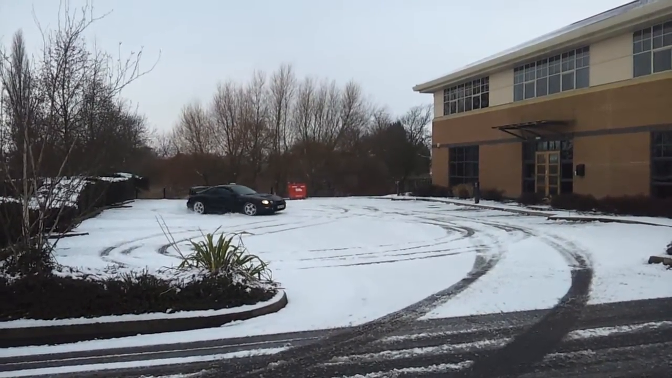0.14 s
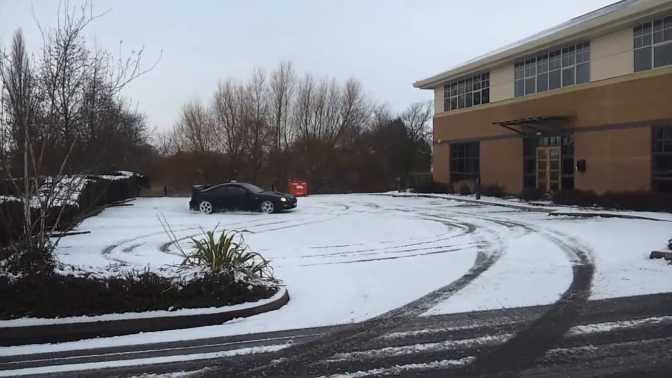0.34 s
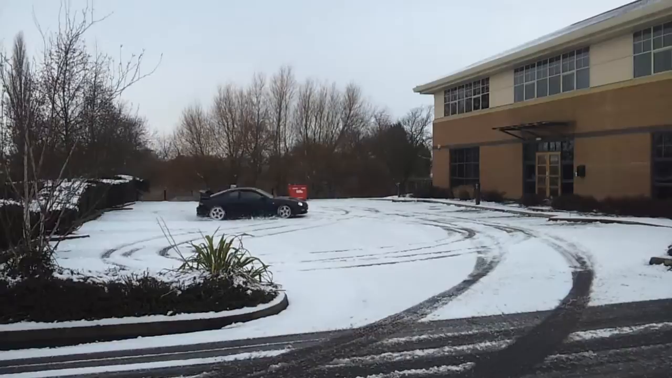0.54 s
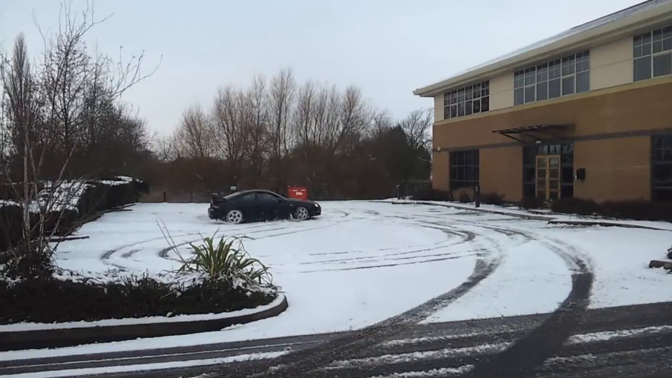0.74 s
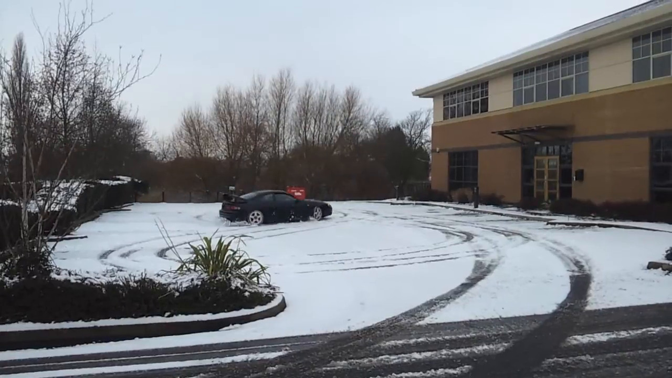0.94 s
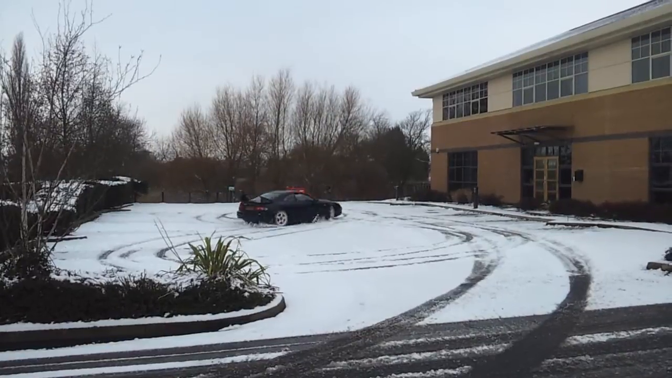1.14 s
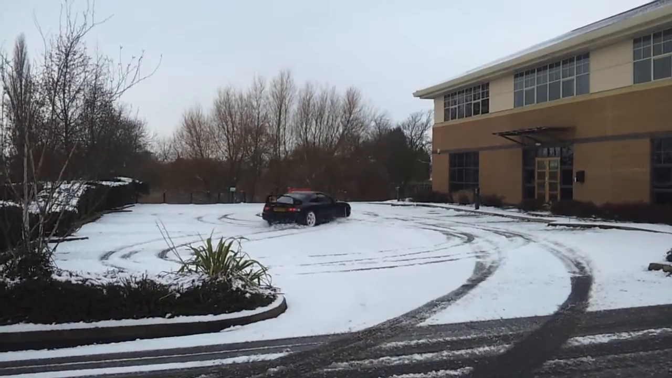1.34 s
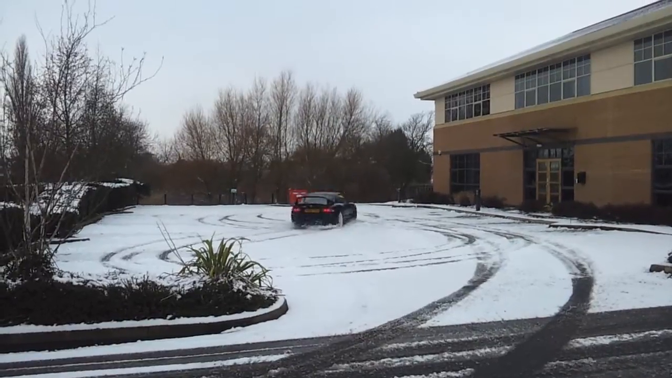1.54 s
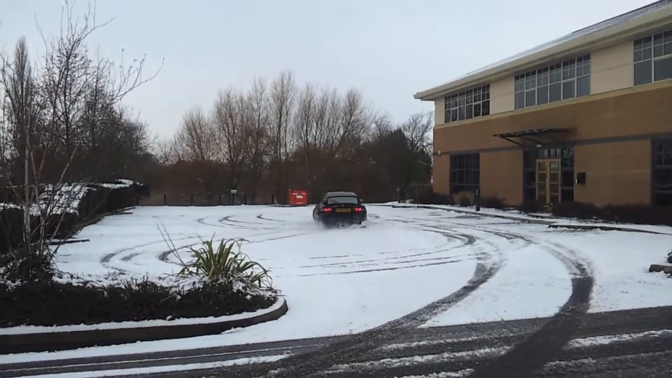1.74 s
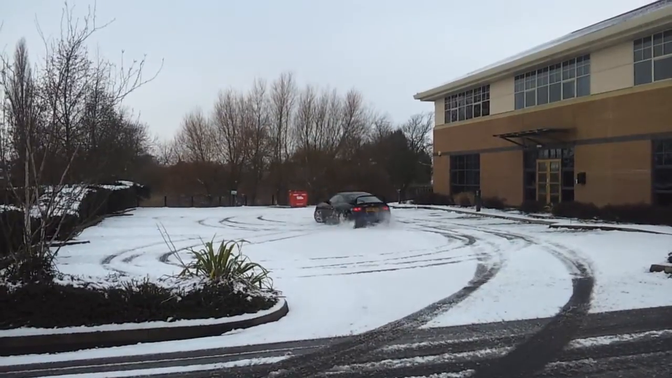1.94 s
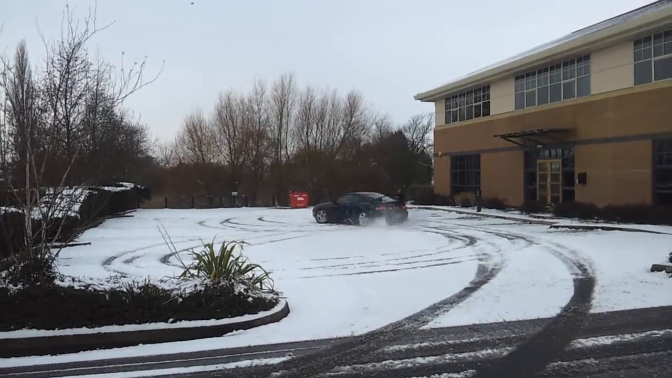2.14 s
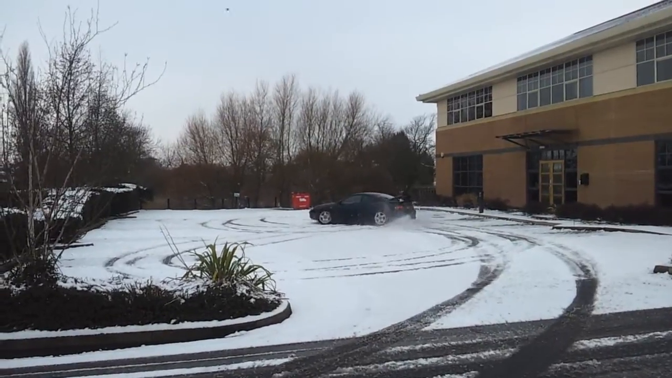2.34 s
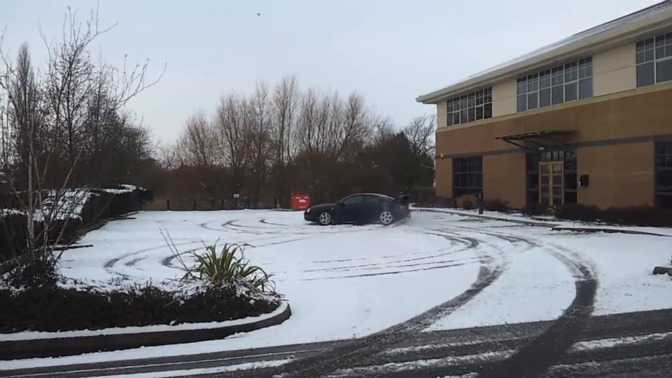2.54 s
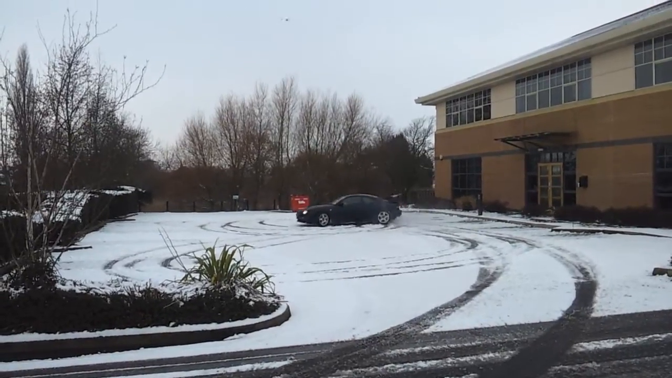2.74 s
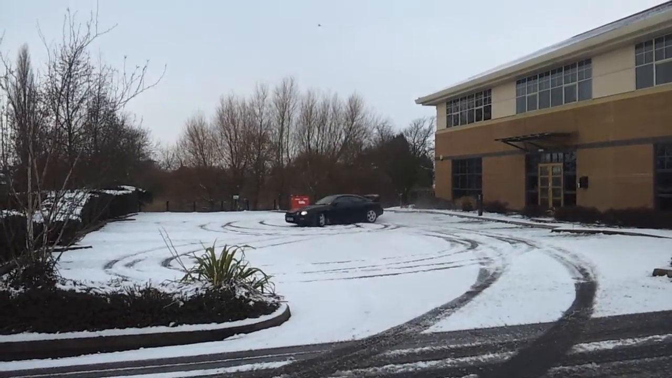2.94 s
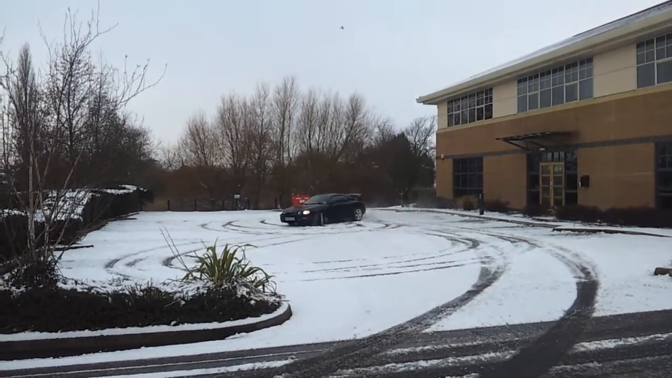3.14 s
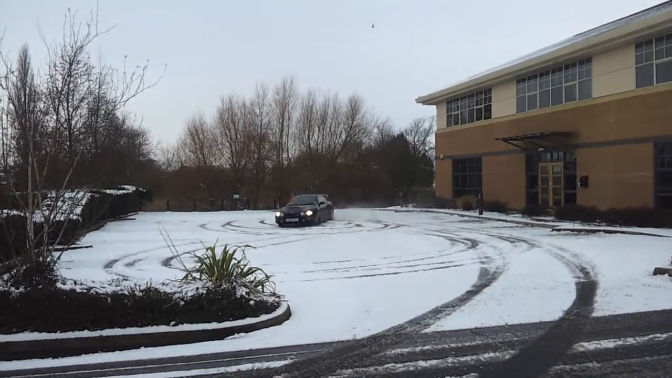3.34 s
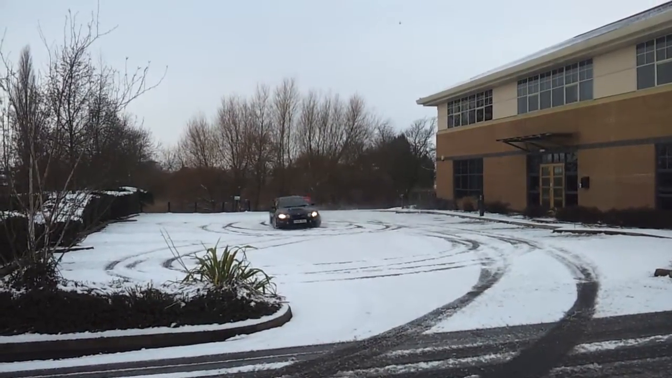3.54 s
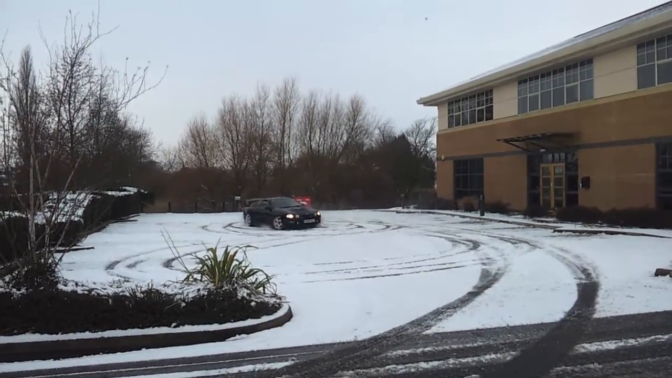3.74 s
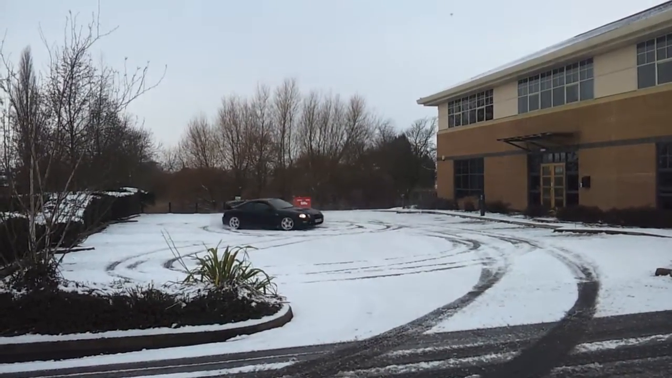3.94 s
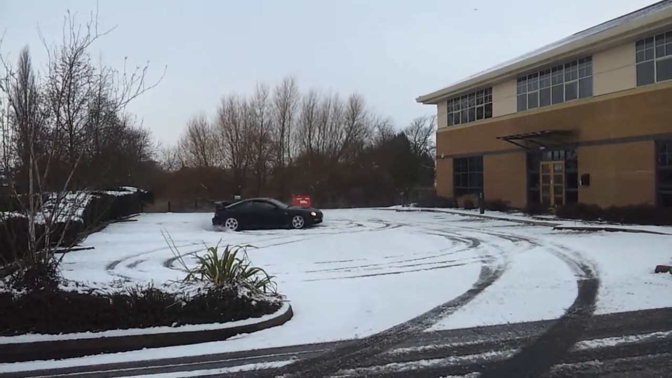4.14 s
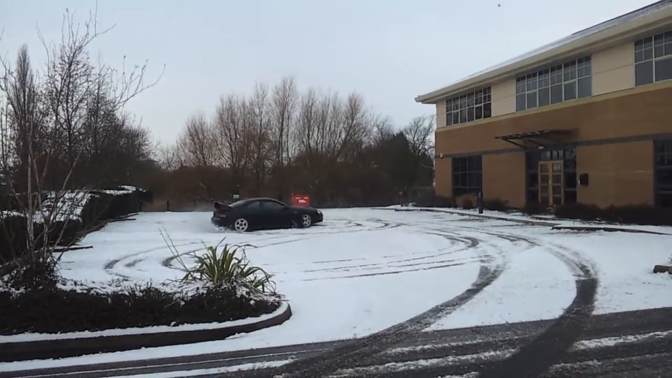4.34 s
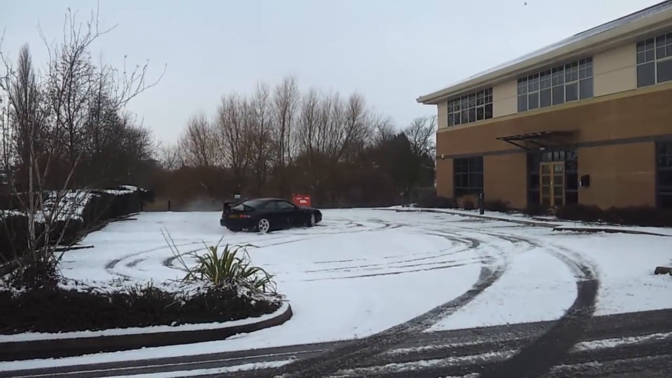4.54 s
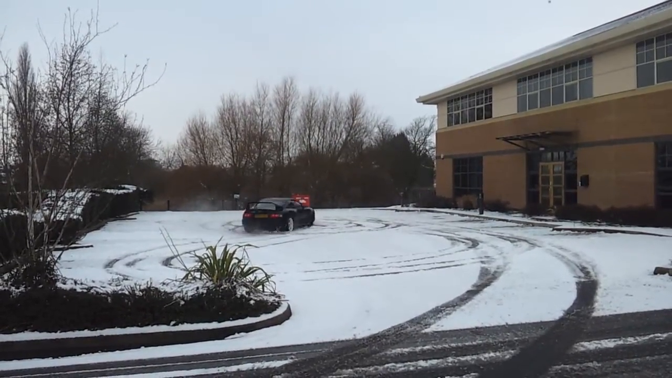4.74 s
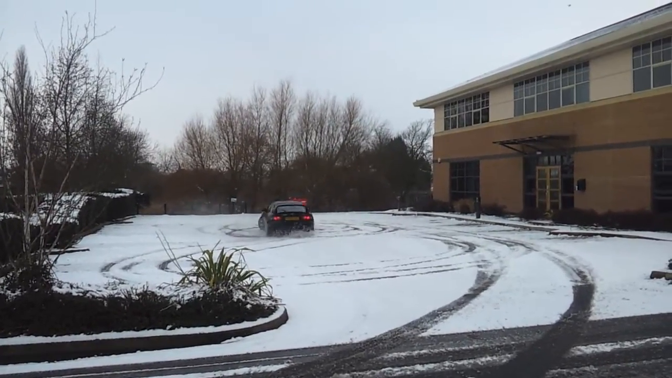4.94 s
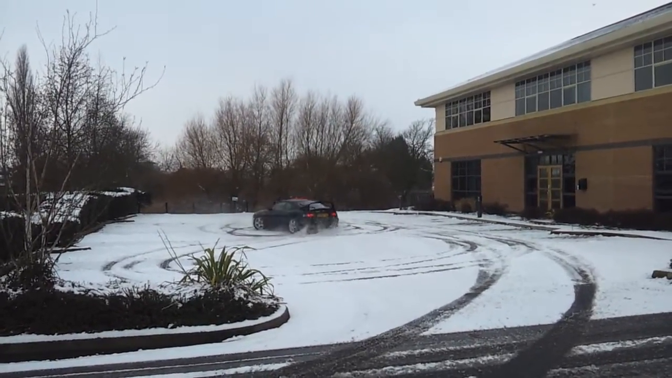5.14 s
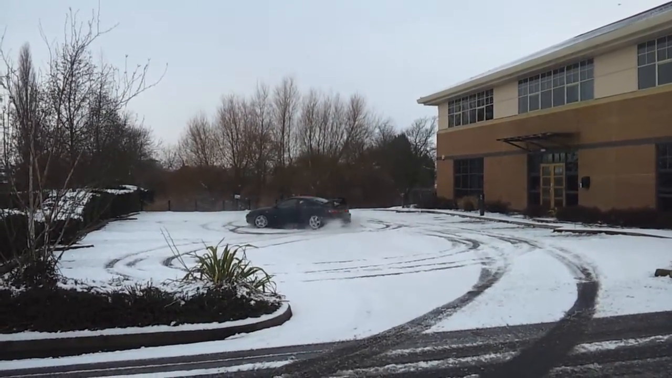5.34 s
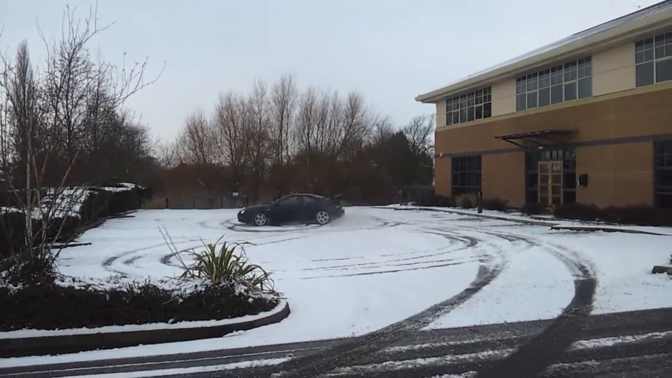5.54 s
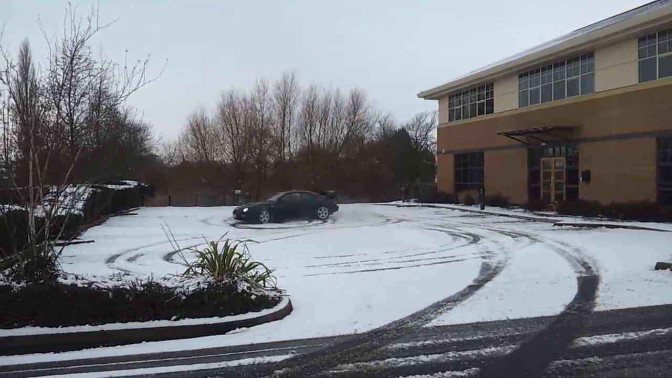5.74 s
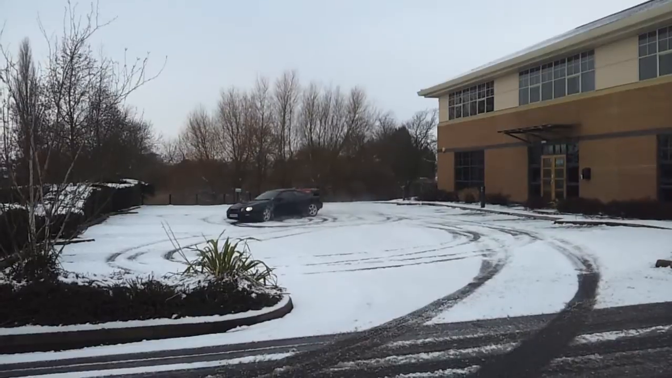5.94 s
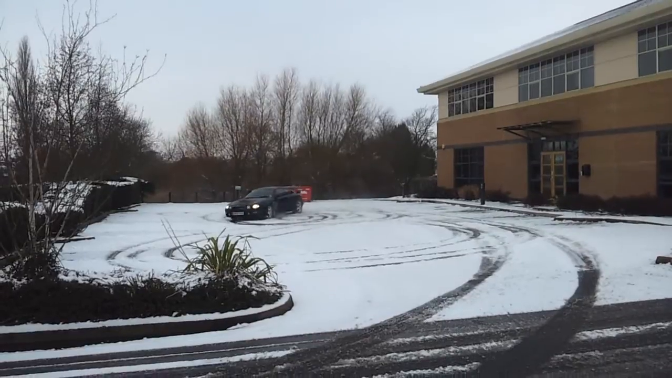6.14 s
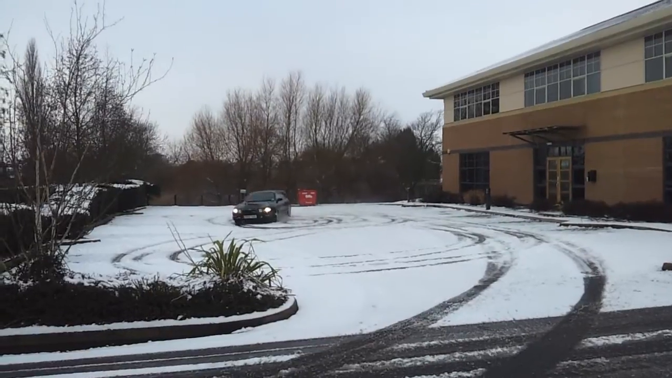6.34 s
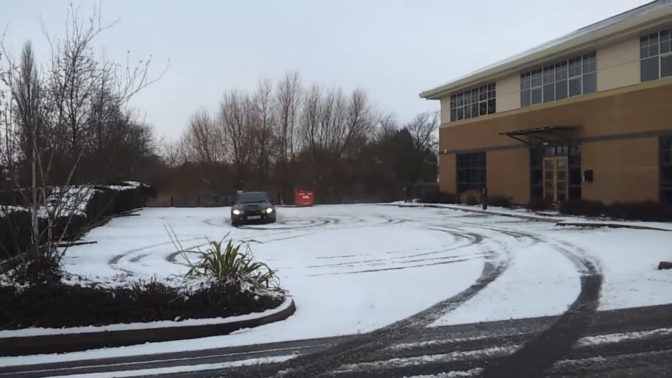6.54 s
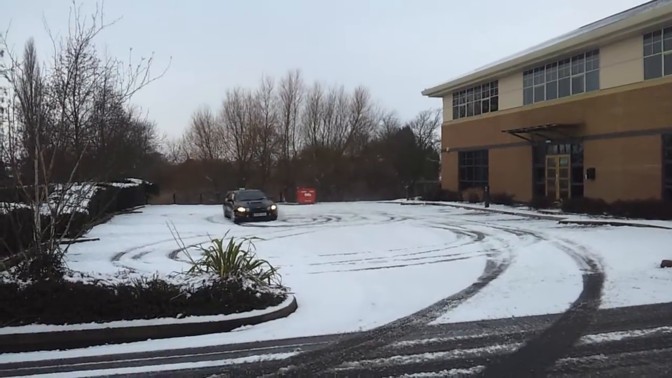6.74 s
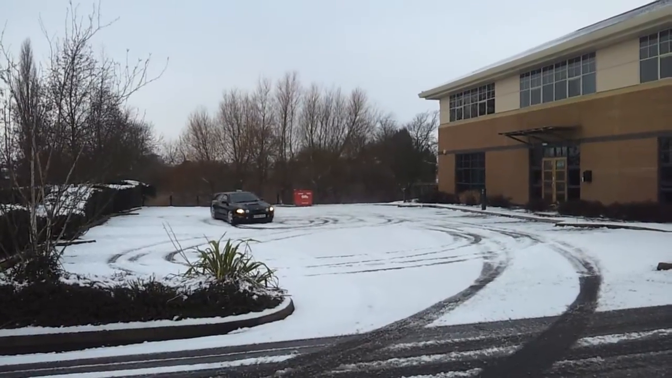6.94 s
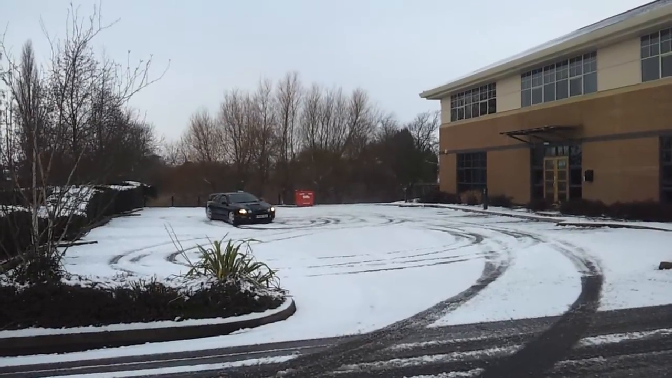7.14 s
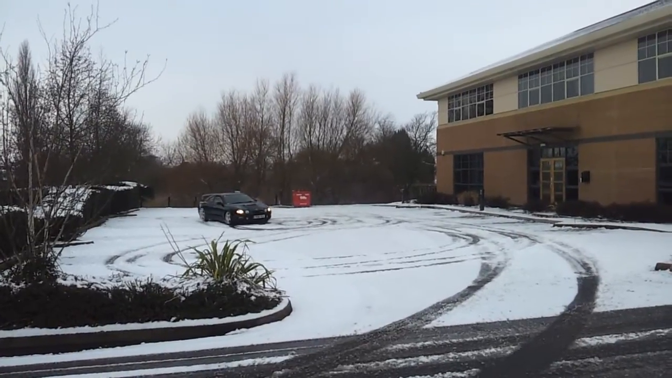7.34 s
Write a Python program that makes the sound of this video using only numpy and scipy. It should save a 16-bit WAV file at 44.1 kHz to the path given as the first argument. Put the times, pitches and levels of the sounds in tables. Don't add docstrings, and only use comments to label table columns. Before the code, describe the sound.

Outdoor car park with dull wall echoes, heard through a small microphone that overloads on loud revs. A turbocharged four-cylinder hums upward, lifts at 0.25 s with a held air hiss and brief squeak, then burbles around 0.6. A low pull runs 0.8-1.2, then a longer one climbs and grows raspy from 1.3 to 2.15, ending in a valve hiss; tyres hiss strongly on snow. Shorter, higher surges follow, lifting at 2.9, 3.4, 3.8, 4.2 and 4.6, each with a sharp whoosh, several with low thumping pops, strongest near 2.46 and 4.3. Faint whistling rides the climbs. The highest, loudest pull runs 4.75-5.27, then a bright backfire crack at 5.3 with burbles and fading air. Revs tumble to a low, quiet idle by 6.7, while wind gusts rumble and slap from 5.9, hardest around 6.5-6.7, thinning out by 7.4.

```python
import sys
import numpy as np
from scipy import signal
from scipy.io import wavfile
from scipy.ndimage import uniform_filter1d

SR = 44100
rng = np.random.default_rng(int(sys.argv[2]) if len(sys.argv) > 2 else 0)


def pcm_store(signal):
    levels = np.round(np.clip(np.atleast_2d(signal), -1, 1) * 32767)
    wavfile.write(sys.argv[1], SR, levels.astype(np.int16).T)


def magnitude_from_level(level_db):
    exponent = np.asarray(level_db, float) / 20
    return 10 ** exponent


N = 325880


def rms_one(x):
    return x / np.sqrt(np.mean(x ** 2) + 1e-20)


def noise():
    return rng.standard_normal(N)


def in_time(rows):
    s, *columns = np.transpose(rows)
    return [np.interp(np.arange(N) / SR, s, c) for c in columns]


def bells(rows):
    t = np.arange(0, N / SR, .001)
    height_now = sum(height * np.exp(-((t - s) / half) ** 2) for s, height, half in rows)
    return in_time(np.transpose([t, height_now]))[0]


def drift(rate):
    r = np.exp(-80 * np.pi * rate / SR)
    slow = signal.lfilter([1], [1, -2 * r, r * r], rng.standard_normal(N // 40 + 2002))[2000:]
    return np.interp(np.arange(N) / 40, np.arange(len(slow)), rms_one(slow))


def band(x, low_hz, high_hz):
    return signal.sosfilt(signal.butter(2, [low_hz, high_hz], "band", fs=SR, output="sos"), x)


def resonate(x, hz, width_hz):
    r = np.exp(-np.pi * width_hz / SR)
    feedback = [1, -2 * r * np.cos(2 * np.pi * hz / SR), r * r]
    return signal.lfilter(np.array([1, 0, -1]) * (1 - r * r) / 2, feedback, x)


def coloured(spectrum, patchy_db):
    hz, level_db = np.transpose(spectrum)
    edges = np.geomspace(hz[0], 13000, 21)
    white, out = rng.standard_normal((2, N)), 0
    for k, (low, high) in enumerate(zip(edges, edges[1:])):
        centre_db = np.interp(np.log(low * high) / 2, np.log(hz), level_db)
        out = out + magnitude_from_level(centre_db + patchy_db * drift(27.0)) * band(white[k % 2], low, high)
    return rms_one(out)


def strikes(events):
    clicks = np.full(N, 1e-18)
    clicks[[round(row[0] * SR) for row in events]] = magnitude_from_level(np.array(events)[:, 1])
    return clicks


# [t/s, level/dB]
WHEELSPIN = [(0.0, -36), (.25, -35.5), (.35, -44), (1.7, -38.5), (1.85, -27), (2.16, -19), (2.43, -41),
             (2.98, -32), (3.07, -34), (3.48, -32), (3.8, -27), (3.95, -31.5), (4.12, -26.5), (4.6, -22.5),
             (5.18, -22), (5.43, -32.5), (6.9, -43.5), (7.39, -52.5)]
# [f/Hz, level/dB per Hz]
TYRE_COLOUR = [(250, -12), (420, -5.5), (746, -4.5), (953, -0.5), (2770, -8.5), (3790, -11.5), (5870, -14),
               (7100, -23.5), (8370, -24), (10300, -42.5), (11000, -79), (14300, -107), (22000, -120)]
# [f/Hz, width/Hz, level/dB against the tyre hiss]
DRONE = [(1960, 300, -7), (990, 330, -15)]


def yard():
    rumble = rms_one(band(band(noise(), 51, 167.9), 30, 213)) * magnitude_from_level(-32 + 2 * drift(4.0))
    white = noise()
    drone = sum(magnitude_from_level(db) * rms_one(resonate(resonate(white, hz, width), hz, width)) for hz, width, db in DRONE)
    tyres = coloured(TYRE_COLOUR, patchy_db=0.5)
    return magnitude_from_level(in_time(WHEELSPIN)[0] + 1.0) * (tyres + drone) + rumble


# [t/s, level/dB, half length/s]
GUSTS = [(5.909, -29, 0.071), (6.13, -21, 0.033), (6.213, -27, .015), (6.356, -28, .03),
         (6.509, -13, 0.021), (6.628, -26, 0.051), (6.742, -20.5, 0.069), (6.929, -21, 0.023),
         (7.026, -28.5, .02), (7.125, -24, 0.044)]
# [t/s, peak level/dB]
SLAPS = [(5.885, -9.5), (6.149, -28), (6.502, -17), (6.515, -18), (6.653, -13), (6.664, -6.5), (6.676, -16),
         (6.691, -20), (6.707, -3), (6.759, -21), (6.774, -37), (6.809, -13), (6.921, -39), (7.024, -20),
         (7.119, -33)]


def wind():
    gusts = bells([(s, magnitude_from_level(db), half) for s, db, half in GUSTS])
    lumps = rms_one(band(band(noise(), 53.2, 225.4), 35, 233))
    lumps = lumps / np.sqrt(uniform_filter1d(lumps ** 2, size=1500) + .1)
    slaps = strikes(SLAPS)
    swings = magnitude_from_level(27) * band(resonate(resonate(slaps, 219.3, 280), 220, 489), 60, 1100)
    wake_level = signal.lfilter([1], [1, -np.exp(-1 / (0.0091 * SR))], slaps)
    wake = magnitude_from_level(-12) * wake_level * rms_one(band(noise(), 141, 440))
    return gusts * lumps + band(swings + wake, 50, 1300)


# [t/s, length/s, f/Hz, level/dB]
SQUEAKS = [(0.237, 0.037, 1620, -32), (0.228, 0.056, 2010, -38), (.715, 0.04, 4450, -43),
           (7.123, 0.021, 5290, -55), (7.344, 0.041, 3180, -62)]


def squeaks():
    out = np.zeros(N + SR)
    for s, length, hz, db in SQUEAKS:
        at, t = round(s * SR), np.arange(round(length * SR)) / SR
        out[at:at + len(t)] += magnitude_from_level(db + 10.5) * np.sin(np.pi * t / length) * np.sin(2 * np.pi * hz * t)
    return out[:N]


# [start t/s, end t/s, from f/Hz, to f/Hz, level/dB]
SPOOLS = [(.0, .28, 8300, 10400, -51), (1.78, 2.15, 7800, 10600, -50), (2.55, 2.9, 7500, 10100, -49),
          (3.13, 3.4, 7400, 9700, -50), (3.53, 3.8, 8100, 10100, -49), (3.93, 4.22, 8200, 10200, -49)]


def turbo():
    out, t = np.zeros(N), np.arange(N) / SR
    flutter, jitter = magnitude_from_level(4.0 * drift(40)), 1 + .02 * drift(150)
    intake = rms_one(band(noise(), 5800, 9500))
    for start, end, from_hz, to_hz, db in SPOOLS:
        on = slice(round(start * SR), round(end * SR))
        done = (t[on] - start) / (end - start)
        hz = (from_hz + (to_hz - from_hz) * done) * jitter[on]
        whistle = 2.5 * flutter[on] * np.sin(2 * np.pi * np.cumsum(hz) / SR)
        hiss = magnitude_from_level(14.5) * (0.44 + done) * intake[on]
        out[on] += magnitude_from_level(db) * np.sqrt(np.abs(np.sin(np.pi * done))) * (whistle + hiss)
    return out


# [t/s, peak level/dB, hold/s, release/dB per s]
DUMPS = [(0.287, -14, .26, 293), (0.71, -35.5, 0.017, 402), (2.17, -18, .22, 246), (2.456, -27, .01, 202),
         (2.912, -11.5, 0.074, 195), (3.402, -12, .03, 447), (3.815, -11, 0.033, 238),
         (4.241, -14.5, 0.046, 100), (4.485, -16.5, 0.14, 256), (5.334, -24.5, 0.18, 12),
         (5.764, -30, 0.17, 14)]


def dumps():
    attack_db_per_s, sag_db_per_s = 351, 35
    t = np.arange(0, N / SR, .001)
    power = 0
    for s, db, hold, release in DUMPS:
        rise = attack_db_per_s * (s - t).clip(0)
        bleed = sag_db_per_s * (t - s).clip(0)
        power = power + magnitude_from_level(db - rise - bleed - release * (t - s - hold).clip(0)) ** 2
    return in_time(np.transpose([t, power]))[0]


# [open t/s, shut t/s, firing rate at opening f/Hz, at shutting f/Hz, bend of the climb]
PULLS = [(0.0, 0.249, 130.8, 158.2, 0.94), (0.759, 1.209, 86.6, 125.5, 1.01),
         (1.32, 2.163, 122.1, 228.4, 1.35), (2.478, 2.902, 158.5, 196.7, 1.19),
         (3.109, 3.417, 157.1, 181.1, 1.01), (3.483, 3.79, 173.7, 214.7, 1.05),
         (3.95, 4.191, 188.2, 219.3, .8), (4.372, 4.623, 193.7, 217.8, 1.05),
         (4.738, 5.27, 215, 251.9, 1.127)]
# [t/s, firing rate f/Hz, hum level/dB, load as rasp level/dB, upper orders facing the listener level/dB]
COAST = [(5.449, 179.4, -14, -26.5, 0), (5.58, 152.9, -10.5, -23.5, -8), (5.66, 141.1, -3, -25.5, -25),
         (5.84, 94.8, -9, -34, -8.5), (5.93, 89.4, -21.5, -48, -10.5), (6.241, 75.95, -30, -54, -2.5),
         (6.379, 67.74, -18, -47, -10), (6.71, 50.1, -23.5, -38, -5), (7.39, 48.8, -39, -36, -3)]


def revs():
    done, points = np.linspace(0, 1, 12, endpoint=False), []
    coast_start, coast_hz = COAST[0][:2]
    following = list(PULLS[1:]) + [(coast_start, 0, coast_hz)]
    for (start, end, low, top, bend), (after, _, floor, *_) in zip(PULLS, following):
        points += zip(start + (end - start) * done, low + (top - low) * done ** bend)
        fall_bend = 1.4 if after < coast_start else .8
        ease = 1 - (1 - done) ** fall_bend
        points += zip(end + (after - end) * done, top + (floor - top) * ease)
    return uniform_filter1d(in_time(points + [row[:2] for row in COAST])[0], size=1500, mode="nearest")


# [f/Hz, level/dB per Hz]
AIR_COLOUR = [(710, -41), (1200, -12), (1350, -6), (1520, -11), (1940, -3.5), (2210, -8), (2580, -8),
              (3090, -10.5), (5180, 3), (7380, -10), (9460, -14), (11800, -27), (15300, -53), (22000, -120)]
# [t/s, level drop/dB, half length/s]
INTAKE_SHADE = [(1.6, 7, 0.66), (4.8, 4.5, 0.11), (7.2, 13, 0.16)]


def boost_air():
    lag = np.exp(-1 / (0.05 * SR))
    octaves = np.log2(revs() / 200)
    shaft = signal.lfilter([1 - lag], [1, -lag], octaves, zi=[octaves[0]])[0]
    intake = magnitude_from_level(-25.5 + 10.5 * shaft - bells(INTAKE_SHADE))
    return np.sqrt(intake ** 2 + dumps()) * coloured(AIR_COLOUR, patchy_db=2.0)


# [t/s, peak level/dB]
BACKFIRE = [(5.3098, 0.5)]


def backfire():
    held = uniform_filter1d(strikes(BACKFIRE), size=400, origin=199) * 400
    fade = np.exp(-1 / (0.0055 * SR))
    envelope = np.maximum(held, signal.lfilter([1 - fade], [1, -fade], held))
    white = noise()
    crack = rms_one(band(white, 3200, 5900)) + 0.85 * rms_one(band(white, 400, 2800))
    return magnitude_from_level(-6.5) * envelope * crack


# [t/s, thump peak level/dB, thump f/Hz, puff peak level/dB]
BURBLES = [(0.246, -18, 157, -7), (0.56, -43, 99, -15), (0.588, -17, 152, -17), (0.618, -20, 105, -18),
           (0.654, -14, 170.1, -30), (0.69, -24, 130.5, -24), (2.199, -20, 88.83, -16),
           (2.458, -7.5, 120.2, 0.5), (2.49, -4, 168, -29), (2.963, -11, 161, -45),
           (2.978, -16.5, 112.2, -31), (2.997, -10, 115, -25), (3.097, -12, 83.1, -10),
           (3.842, -14, 84, -29), (3.889, -10.5, 107, -5), (4.22, -11, 152, -20), (4.278, -3, 117, -12),
           (4.308, -4.5, 135, -17), (4.342, -5.5, 159, 1.5), (5.236, -8, 119.2, -25),
           (5.312, -4.5, 145, -6), (5.344, -8, 154, 2.5), (5.378, -7.5, 138.9, -27), (5.43, -13, 106, -32),
           (5.87, -29, 90, -30)]


def burbles():
    out, t = np.zeros(N), np.arange(4000) / SR
    for s, peak_db, hz, puff_db in BURBLES:
        at = round(s * SR)
        thump = np.sin(2 * np.pi * hz * t) * t / 0.014 * np.exp(1 - t / 0.0093)
        puff = rms_one(band(rng.standard_normal(4000), 150, 800)) * np.exp(-t / .012)
        out[at:at + 4000] += magnitude_from_level(peak_db + 3.0) * thump + magnitude_from_level(puff_db - 11.0) * puff
    return out


# [t/s, hum level/dB, load as rasp level/dB, upper orders facing the listener level/dB]
TAIL = [(0.0, -7.5, -46, -7), (.27, -8.5, -24.5, -11), (.65, -13.5, -31, -10.5), (.9, -15.5, -32, 3.5),
        (1.15, -7, -24.5, -8.5), (1.54, -8.5, -24.5, 0.5), (1.911, -4, -13, -2.5), (2.2, -10, -9, 9),
        (2.3, -4, -18, -5), (2.6, -10, -25.5, 1.5), (2.86, -6, -13, -6), (3.0, -16, -24.5, -1),
        (3.45, -8.5, -28.5, -13), (3.75, -9, -18.5, -17), (4.15, -5.5, -21, -6.5), (4.6, -6.5, -14.5, -9),
        (5.05, -1.5, -13, -6), (5.25, -5.5, -13, -0.5)]
# [f/Hz, level/dB against the hum]
SILENCER = [(200, -1), (275, 3), (340, -10), (400, -18.5), (490, -6), (600, -12), (730, -11), (1200, -9.5)]
# [t/s, depth level/dB, half length/s]
FADES = [(.22, 4, .04), (.58, 12, .03), (.67, 8, .06), (1.27, 4, .04), (1.7, 11, .04), (2.12, 16, .025),
         (2.39, 9, .03), (2.98, 15, .03), (3.14, 12, .04), (3.33, 7, .03), (3.55, 6, .04), (3.64, 8, .025),
         (3.87, 12, .03), (4.085, 9, .025), (4.235, 15, .02), (4.33, 10, .025), (5.29, 22, .025),
         (5.6, 7, .02), (5.71, 20, .022)]


def orders(hz):
    hum_db, load_db, facing_db = in_time(list(TAIL) + [(s, *levels) for s, _, *levels in COAST])
    silencer_hz, silencer_db = np.transpose(SILENCER)

    def passed(k):
        return hum_db + facing_db + np.interp(np.log(k * hz), np.log(silencer_hz), silencer_db)

    crank_db = -24.5 + 0.58 * (load_db + 23.5) + 10 * np.log2(hz.clip(120) / 200)
    return hum_db - bells(FADES), passed, crank_db, load_db


def tone(turns, k, db, waver_db):
    level = np.sqrt(2) * magnitude_from_level(db + waver_db * drift(13))
    return level * np.sin(2 * np.pi * (k * turns + rng.random() + 0.021 * waver_db * drift(43)))


# [multiple of firing rate, level/dB against the hum as the silencer passes
CLEAN_UP = [(2.5, -8.5), (4, -7.5), (5, -11), (6, -13.5)]


def exhaust_hum(turns, hz, pulling):
    tone_db, passed, crank_db, rasp_db = orders(hz)
    hum = tone(turns, 0.99, tone_db, 0.96)
    hum += tone(turns, 2, passed(1.933) + 7 * np.log(pulling), 1.95)
    hum += tone(turns, 3, passed(2.926) - 2.5 + 6 * np.log(pulling), 2.0)
    hum += tone(turns, .5, crank_db, 2.54)
    hum += pulling * tone(turns, 1.5, crank_db - 5, 3.8)
    load_db = .7 * (rasp_db + 20).clip(None, 2)
    for k, db in CLEAN_UP:
        hum += pulling ** 2 * tone(turns, k, passed(k) + db + load_db + 3 * drift(4), 4)
    return hum


# [multiple of firing rate, level/dB]
ORDERS_UP = [(1.5, -4.5), (2.5, -11), (3.5, -8.5), (4, -17), (4.5, -7.5), (5, -11.5), (6, -20.5)]
# [f/Hz, width/Hz, level/dB]
PIPE = [(256.6, 35.3, 9), (512, 97, 7.5), (583, 247, 3.5), (948, 180, 1), (1403, 310, -5), (2170, 120, -27)]


def exhaust_rasp(turns, pulling, rasp_db):
    upper = pulling * sum(tone(turns, k, db - 3, 4.5) for k, db in ORDERS_UP)
    firing = turns.astype(int)
    strength = magnitude_from_level(3.66 * rng.standard_normal(2000))[firing]
    puff = np.exp(-3.0 * (turns - firing))
    knock = np.diff(firing, prepend=0) * 11.6
    gas = rms_one(strength * (knock + (puff + 0.97) * noise()))
    rasp = 0
    for k, (hz, width, db) in enumerate(PIPE):
        mode_db = db + 0.031 * k * (rasp_db + 29.5)
        rasp = rasp + (-1) ** k * magnitude_from_level(mode_db) * resonate(gas * 3.96 + upper, hz, width)
    return magnitude_from_level(rasp_db - 1.94) * rms_one(rasp)


# [start t/s, end
# t/s]
MISFIRES = [(.27, .33), (.55, .72), (2.2, 2.27), (2.44, 2.5), (2.94, 3.14), (3.82, 3.9), (4.22, 4.36),
            (5.235, 5.46)]


def exhaust():
    hz = revs()
    turns = np.cumsum(hz * (1 + .004 * drift(25))) / SR
    pulling = np.clip(1.09 + uniform_filter1d(np.gradient(hz) * SR, size=2000) / 110, .1, 1)
    t = np.arange(N) / SR
    uneven = sum((t > start) & (t < end) for start, end in MISFIRES)
    unevenness_db = 7 * rng.standard_normal(2000)[turns.astype(int)] - 3
    misfire = uniform_filter1d(magnitude_from_level(uneven * unevenness_db).clip(0, 1.5), size=150)
    flutter = uniform_filter1d(uneven * magnitude_from_level(-21.5), size=600) * rms_one(band(noise(), 60, 288))
    rasp_db = orders(hz)[3]
    return exhaust_hum(turns, hz, pulling) * misfire + flutter + exhaust_rasp(turns, pulling, rasp_db)


# [delay t/s, level/dB]
ECHOES = [(0.043, -16), (.067, -18.5), (0.104, -18.5), (0.159, -24)]


def scene():
    car = exhaust() + burbles() + backfire() + boost_air() + turbo() + squeaks()
    dull = band(car, 65, 3000)
    echoes = sum(magnitude_from_level(db) * np.pad(dull, (round(s * SR), 0))[:N] for s, db in ECHOES)
    return (car + echoes + wind() + yard())[None]


def thin_top(x, floor_db, rise_db, follow):
    hz, _, cells = signal.stft(x, SR, nperseg=2048)
    hiss = np.abs(cells[:, (hz > 4000) & (hz < 8000)]).mean(axis=1, keepdims=True)
    khz = np.where(hz > 8000, hz / 1000 - 10, -20)
    limit = magnitude_from_level(floor_db + rise_db * khz)[:, None] * (hiss / magnitude_from_level(-57.0)) ** follow
    kept = (np.abs(cells) > limit) & (hz < 11930)[:, None]
    return signal.istft(cells * kept, SR, nperseg=2048)[1][..., :N]


def roll_off(x):
    return signal.sosfilt(signal.butter(12, 15830, fs=SR, output="sos"), x)


def record(dry):
    cut = signal.sosfilt(signal.butter(2, 32, "high", fs=SR, output="sos"), dry)
    rounded = np.tanh(magnitude_from_level(-0.05) * cut / 1.043)
    ceiling = .705
    over = thin_top(rounded, floor_db=-71.5, rise_db=2.0, follow=0.66) / ceiling
    shaved = ceiling * over / (1 + np.abs(over) ** 40) ** (1 / 40)
    return roll_off(shaved)


dry = scene()
out = record(dry)
pcm_store(out)
```